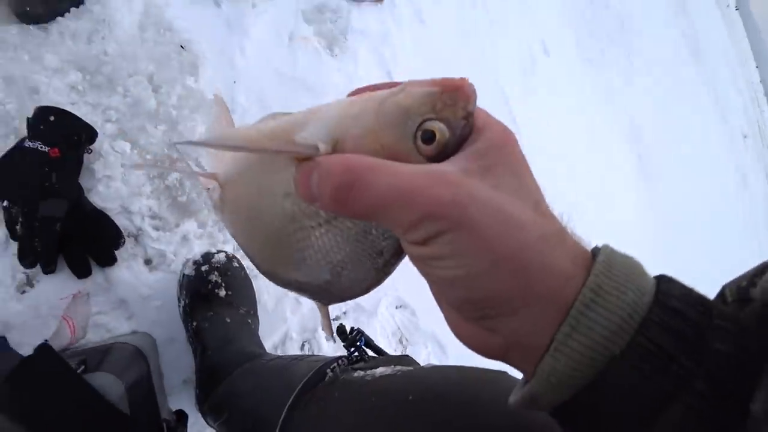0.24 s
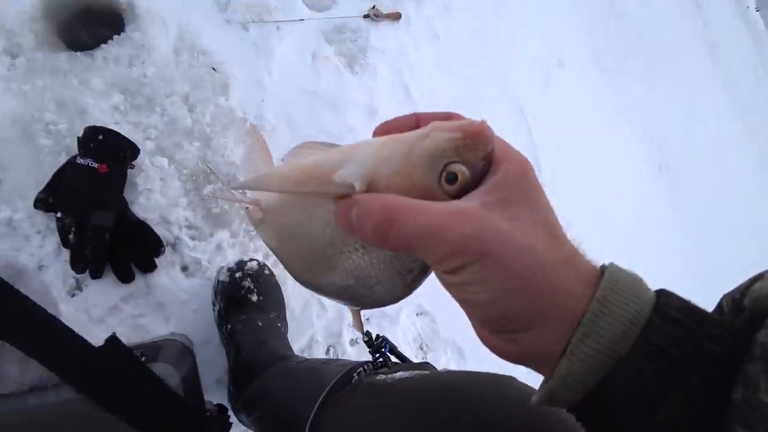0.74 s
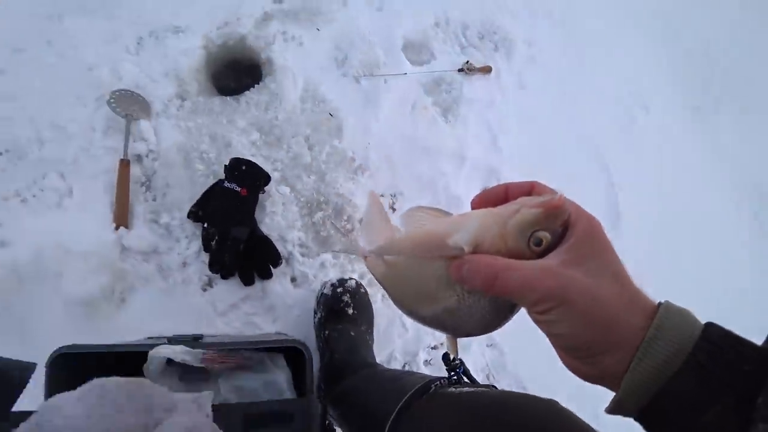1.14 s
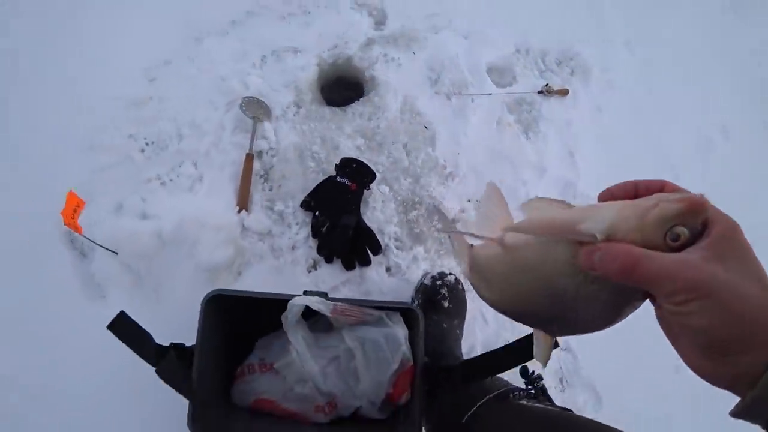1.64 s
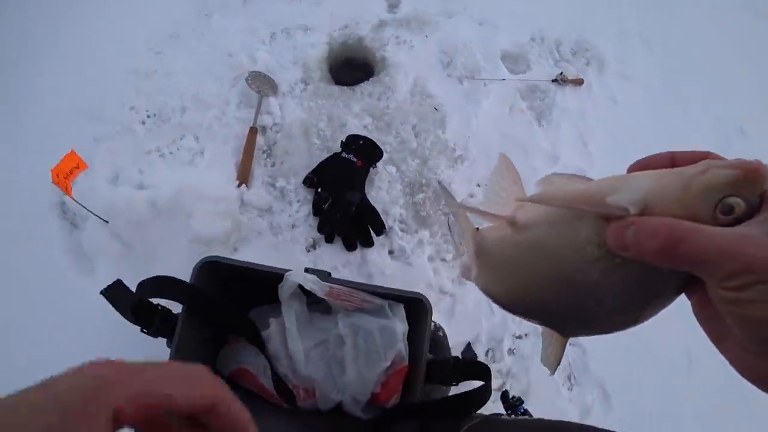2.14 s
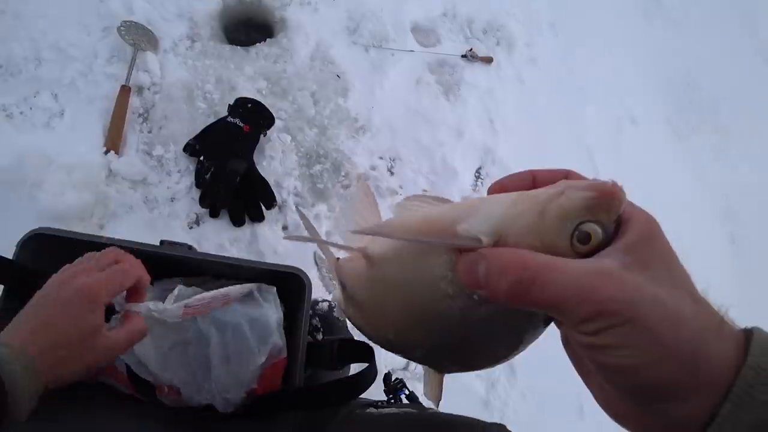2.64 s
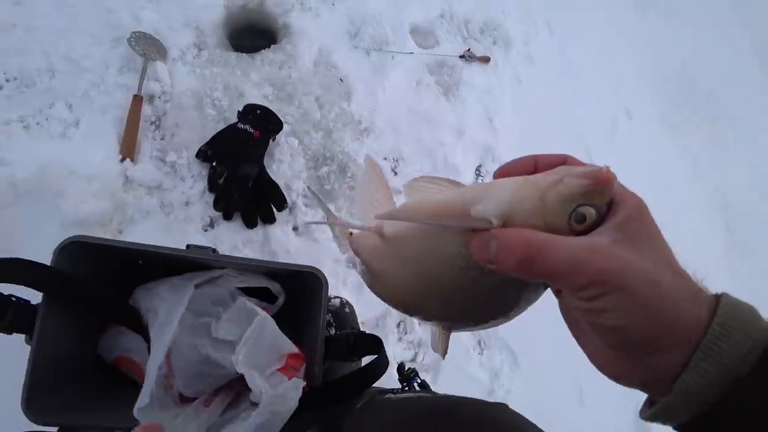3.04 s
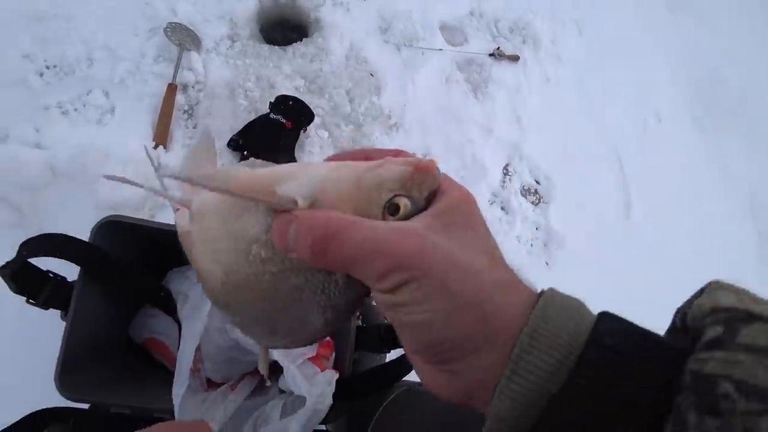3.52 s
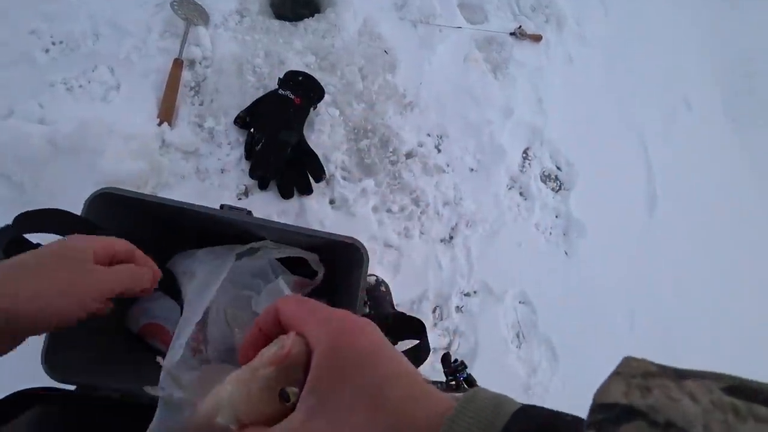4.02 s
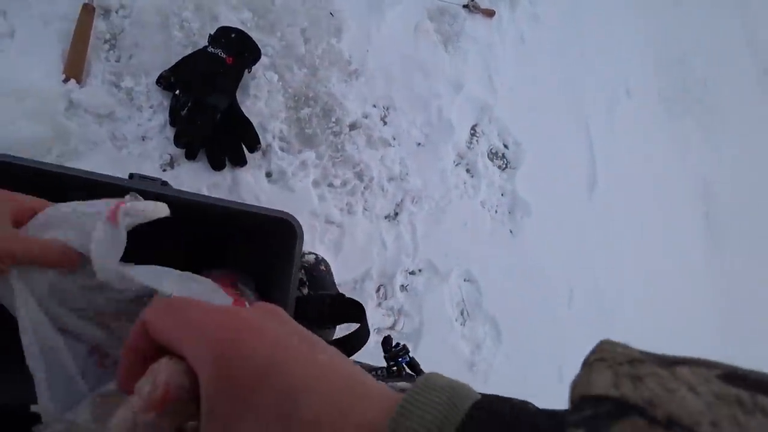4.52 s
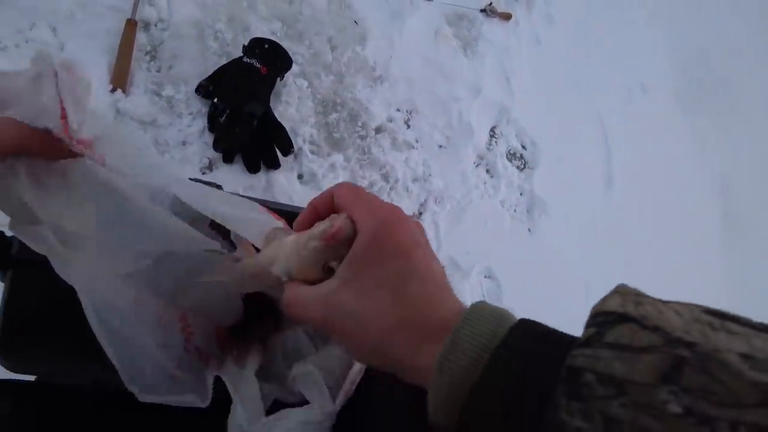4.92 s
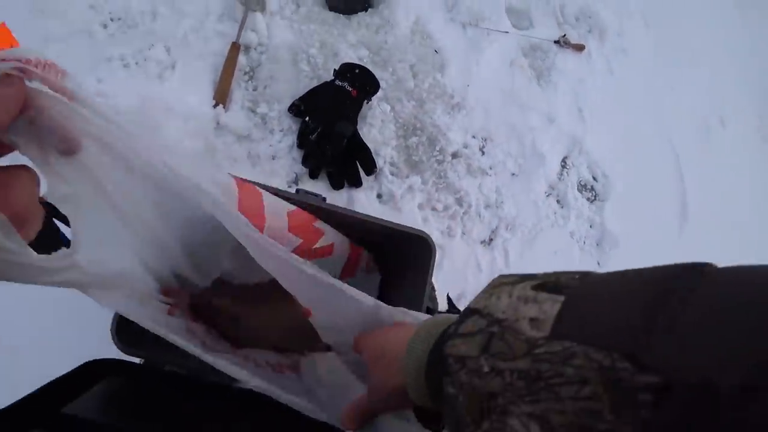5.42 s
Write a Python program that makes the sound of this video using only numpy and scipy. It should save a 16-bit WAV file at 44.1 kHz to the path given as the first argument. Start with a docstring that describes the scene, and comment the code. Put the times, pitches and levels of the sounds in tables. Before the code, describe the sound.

Close body-worn stereo microphone outdoors on a frozen lake. Low wind rumble and a dull double bump, then a hard flurry of hollow plastic box clatter with a small metallic clink, followed by loud bag crackling that thins into softer, crisp rustling as a fish goes in.

```python
"""A thin sheet rustles and snaps as an angler on a frozen lake drags a sack, then pulls open a plastic
bag in a tackle box and pushes a fish in: clumps of random creases over a sliding hiss, plus single cracks.
The plastic box clatters with its lid and buckle: decaying modes in thud, clack and tick layers.
Padded bumps and scrapes are modes and coloured grains; wind on two body-worn ports is coloured noise."""
import sys
import numpy as np
from scipy import signal
from scipy.fft import rfft, irfft
from scipy.io import wavfile

SR = 44100
rng = np.random.default_rng(int(sys.argv[2]) if len(sys.argv) > 2 else 0)


def dump(signal):
    """Clip the signal to [-1, 1] and save it as 16-bit WAV at the path in sys.argv[1]."""
    limited = np.clip(np.atleast_2d(signal).T, -1, 1)
    pcm = np.round(limited * 32767).astype(np.int16)
    wavfile.write(sys.argv[1], SR, pcm)


N = 249991

# moves of a hand that crumple sack or bag: start_s, length_s, hiss level_db, crispness_db
CRUMPLE_MOVES = [(0.073, .11, -52.5, -12.5), (0.313, 0.032, -45, -8), (0.56, .31, -50.5, -5.5),
                 (0.865, 0.15, -44.5, -1.5), (1.048, 0.16, -42, -5), (1.147, 0.1, -33.5, -1.5),
                 (1.244, 0.07, -28, -2), (1.339, 0.11, -33.5, -2), (1.466, 0.37, -39, -4.5),
                 (1.775, 0.13, -32, -4), (1.947, 0.03, -22, 1.5), (2.114, 0.061, -31, 0.5),
                 (2.212, 0.22, -34.5, -0.5), (2.405, 0.17, -22.5, 1), (2.616, 0.19, -25.5, -2),
                 (2.702, .22, -18, 3), (2.995, 0.032, -23.5, 3.5), (3.117, 0.12, -30.5, 4),
                 (3.299, 0.13, -33.5, 3), (3.467, 0.082, -38, 3), (3.56, 0.05, -34, 3.5),
                 (3.697, .18, -36, 2.5), (4.08, 0.16, -45.5, -0.5), (4.28, 0.16, -34.5, 0.5),
                 (4.448, 0.094, -34, 0.5), (4.526, .32, -29, 2.5), (4.877, 0.32, -31.5, 5),
                 (5.151, 0.33, -27.5, 5.5), (5.519, 0.17, -31, 6)]
# spectrum of the rustling film: frequency_hz, relative density_db
BAG_COLOUR = [(150, -0.5), (300, -4.5), (600, -6), (1000, -4), (1450, -2), (2200, -3.5), (4300, -1.5),
              (7600, -2.5), (8800, -4.5), (10200, -0.5), (11200, -5), (13000, -3)]
# single stiff creases that snap: start_s, relative level_db
CREASE_SNAPS = [(0.391, -25.5), (1.4604, -11.5), (1.9599, -2.5), (2.076, -14), (2.2573, -19),
                (2.308, -13.5), (2.4335, -3), (2.5426, -18), (2.76, -5), (2.844, -13), (2.984, -17),
                (3.013, -5), (3.233, -8.5), (3.342, -11), (4.103, -23)]
# knocks on the box: start_s, thud pitch_hz, then relative thud_db, clack_db, tick_db
BOX_KNOCKS = [(0.5, 232, -26.5, -34, -38), (0.535, 234, -26.5, -41.5, -53), (.994, 445, -19.5, -18, -22.5),
              (1.127, 400, -43, -18.5, -19.5), (1.145, 403, -31, -17.5, -19), (1.198, 460, -22.5, -24, -34),
              (1.267, 398, -6, -5.5, 4), (1.311, 389, -6.5, -4.5, -19), (1.3641, 442, -6.5, -1.5, -16),
              (1.385, 442, -7.5, -16, -9.5), (1.404, 433, -16, -18, -20), (1.419, 410, -26, -9.5, -7.5),
              (1.432, 557, -12.5, -12.5, -35), (1.469, 417, -8.5, -20, -34), (1.495, 392, -25, -19, -8),
              (1.506, 312, -12, -14.5, -28), (1.519, 323, -21, -21, -24), (1.533, 616, -30, -21, -24),
              (1.571, 380, -21.5, -13.5, -29), (1.593, 280, -20, -17.5, -24), (1.627, 400, -18, -25, -24),
              (1.664, 562, -5, 4.5, -6.5), (1.692, 574, -7.5, -6, -11), (1.788, 314, -17, -15.5, -12),
              (1.836, 386, -15, -20, -12), (1.852, 390, -16, -34, -28), (1.931, 237, -17, -17, -26),
              (1.992, 290, -16, -24, -21), (2.027, 722, -11.5, -19, -15), (2.14, 286, -18.5, -23.5, -25)]
# struck panel, pitched by the spot: multiple of thud pitch (ratio), t60_s, relative level_db
THUD_MODES = [(.72, 0.074, -4.5), (1, 0.059, 0.5), (1.1, 0.027, -1), (1.42, 0.038, -6.5)]
# stiffer box walls and rim: frequency_hz, t60_s, relative level_db
CLACK_MODES = [(818, 0.058, -8.5), (958, 0.028, -6.5), (1128, 0.043, 0), (1295, 0.042, -2.5),
               (1606, 0.042, -2.5), (1885, 0.018, -1)]
# stiffest, brightest modes of the box: frequency_hz, t60_s, relative level_db
TICK_MODES = [(2780, 0.018, -1.5), (2910, 0.011, 4.5), (3210, 0.024, -1), (3760, 0.01, 2.5),
              (5200, 0.024, -9)]
# rings of the strap buckle: start_s, level_db
BUCKLE_CLINKS = [(1.668, -13), (1.692, -24)]
# metal buckle: frequency_hz, t60_s, relative level_db
BUCKLE_MODES = [(2250, 0.28, -7.5), (4413, 0.28, -8.5), (4540, 0.12, -4.5), (6860, 0.04, -7),
                (9900, 0.026, -2)]
# dull bumps of hands and gear: start_s, pitch_hz, level_db, scuff against body_db
HAND_BUMPS = [(.332, 162.5, -8, -4), (0.3393, 296, -7, -6), (2.405, 213, -21, -14), (4.238, 258, -24, -16),
              (5.432, 133, -17.5, -17)]
# padded body of a bump: multiple of bump pitch (ratio), t60_s, relative level_db
BUMP_MODES = [(.74, 0.06, -3.5), (1, 0.072, -0.5), (1.35, 0.045, -4), (1.95, 0.066, -10.5), (3.4, 0.012, 5)]
# gear and sleeves scraping over the box: start_s, length_s, level_db
SCRAPE_MOVES = [(0.783, 0.34, -42), (1.112, 0.17, -34), (1.33, 0.2, -28.5), (1.592, 0.12, -30.5),
                (1.784, 0.21, -29), (2.129, 0.033, -32.5), (2.353, 0.21, -35), (4.274, 0.24, -50),
                (5.36, 0.25, -45.5)]
# spectrum of scraping: frequency_hz, relative density_db
SCRAPE_COLOUR = [(110, -26), (190, 2), (380, -6), (520, -8), (750, -7), (1000, -17.5), (2400, -17.5),
                 (3500, -47)]
# wind strength: time_s, relative level_db, straight lines in between
WIND_STRENGTH = [(0.0, -24), (0.08, -20.5), (0.4, -25), (0.68, -29), (0.95, -22), (1.1, -38.5),
                 (1.35, -23.5), (1.8, -24), (2.02, -30.5), (2.5, -25), (2.9, -24.5), (3.58, -30),
                 (3.75, -38), (4.05, -41), (4.6, -42.5), (5.15, -35), (5.67, -40.5)]
# spectrum of the big eddies: frequency_hz, relative density_db
RUMBLE_COLOUR = [(10, -10), (22, 2.5), (40, -1.5), (65, -7.5), (100, -18.5), (200, -63.5)]
# spectrum of the small eddies: frequency_hz, relative density_db
FLUTTER_COLOUR = [(40, -8.5), (75, 1), (115, 3), (160, -4.5), (230, -12.5), (400, -21.5), (1000, -41)]
# stereo image of the near sounds: frequency_hz, left phase lead_rad, left minus right level_db
PORT_BALANCE = [(150, 0.019, -1), (500, -0.47, 3.5), (1100, -0.8, 4.5), (2200, -0.66, 4.5),
                (4500, -0.22, 2.5), (7800, 0.67, 5), (10500, 0.61, 4)]

TIME = np.arange(N) / SR
FREQS = np.maximum(np.arange(N // 2 + 1) * SR / N, 1)
HIT_TIME = np.arange(SR // 3) / SR
TOP_HZ = 11100  # upper limit of the whole sound
SPEED_UP_SHARE = 0.3  # a hand gathers speed over this share of its move
CRUMPLE_SETTLE_S, CRUMPLE_REST_DB = 0.072, -54  # film relaxes (time constant); faint stirring in between
CREASE_DB_PER_DB = 0.81  # dB gained in tight creases for each dB lost in broad folds
SCRAPE_SETTLE_S, SCRAPE_REST_DB = 0.054, -54  # scrape dies away (time constant); faint rub in between
FLUTTER_DB_PER_DB, WIND_USUAL_DB = 0.97, -28  # small eddies grow with wind, counted from its usual level


def crumpling():
    """Gain and crispness (dB) of the sheet; overlapping moves add in power."""
    power, crisp_sum = undb(CRUMPLE_REST_DB) ** 2, 0
    for s, length, db, crisp_db in CRUMPLE_MOVES:
        share = (undb(db) * move(s, length, CRUMPLE_SETTLE_S)) ** 2
        power = power + share
        crisp_sum = crisp_sum + crisp_db * share
    return np.sqrt(power), crisp_sum / power


def bag(rate=7000, spread_db=4.0, crack_rate=110, crack_db=-11, clump_db=1.28, patchy_db=1.5,
        slide_db=-1, width=0.34, body_db=-4.5, fine_db=-6.0, hiss_db=-1):
    """Creases buckle in clumps, each with its own colour, over the hiss of film sliding on film."""
    effort, crisp = crumpling()
    # a haze of tiny creases, and a few stiff ones that tick on their own
    haze = unit(buckles(rate, spread_db))
    ticks = unit(buckles(crack_rate, spread_db=2.0))
    clicks = haze + undb(crack_db) * ticks
    edges = np.geomspace(180, 13000, num=13)
    film = 0
    for lo, hi in zip(edges, edges[1:]):
        # every crease lies elsewhere on the sheet: its own mid and side weight
        creases = clicks * rng.standard_normal((2, N))
        slide = undb(slide_db) * rng.standard_normal((2, N))
        film = film + band(creases + slide, lo, hi) * undb(patchy_db * walk(35))
    film = colour(film, BAG_COLOUR) * undb(clump_db * walk(110))
    # broad folds sound low, tight creases high
    spectrum = rfft(film)
    low = irfft(spectrum / (1 + (FREQS / 2500) ** 4), N)
    high = irfft(spectrum / (1 + (7600 / FREQS) ** 8), N)
    hiss = undb(hiss_db) * unit(film - low - high)
    folds = undb(body_db - crisp) * unit(low)
    tight = undb(fine_db + CREASE_DB_PER_DB * crisp) * unit(high)
    mid, side = effort * (hiss + folds + tight)
    return mid + width * np.array([side, -side])


def snaps(gain_db=-3):
    """Single stiff creases flip over, each a short bright noise crack."""
    out = np.zeros(N)
    for s, db in CREASE_SNAPS:
        add(out, s, undb(db + gain_db) * burst(2260, 10700, t60=0.023))
    return out


def box(contact_s=0.00026, chatter_s=0.00299, chatter_db=-5, crack_db=-9,
        thud_gain_db=0, clack_gain_db=-1.0, tick_gain_db=-1):
    """Lid and fittings strike the hollow plastic box; each knock has its own levels of thud, clack and tick."""
    out = np.zeros(N)
    for s, thud_hz, thud_db, clack_db, tick_db in BOX_KNOCKS:
        panel = [(thud_hz * ratio, t60, db) for ratio, t60, db in THUD_MODES]
        thud = ring(panel, detune=0.025, scatter_db=4.5)
        clack = ring(CLACK_MODES, detune=0.029, scatter_db=2.5)
        # the loose part chatters against the wall just after the blow
        add(clack, chatter_s, undb(chatter_db) * burst(420, 1420, t60=0.035))
        tick = ring(TICK_MODES, detune=0.054, scatter_db=1.0)
        tick = tick + undb(crack_db) * burst(3800, 9400, t60=0.016)
        blow = undb(thud_db + thud_gain_db) * thud
        blow = blow + undb(clack_db + clack_gain_db) * clack
        blow = blow + undb(tick_db + tick_gain_db) * tick
        add(out, s, blow * (1 - np.exp(-HIT_TIME / contact_s)))
    for s, db in BUCKLE_CLINKS:
        add(out, s, undb(db) * ring(BUCKLE_MODES, detune=0, scatter_db=2.5))
    return out


def handling(scrape_db=0, press_s=0.00036):
    """Padded bumps with a scuff of cloth, and gear that sticks and slips over the box."""
    rub = undb(SCRAPE_REST_DB)
    for s, length, db in SCRAPE_MOVES:
        rub = rub + undb(db + scrape_db) * move(s, length, SCRAPE_SETTLE_S)
    grains = buckles(1500, spread_db=4.5) * rng.standard_normal(N)
    out = rub * colour(grains, SCRAPE_COLOUR)
    for s, hz, db, scuff_db in HAND_BUMPS:
        padded = [(hz * ratio, t60, mode_db) for ratio, t60, mode_db in BUMP_MODES]
        body = ring(padded, detune=0.047, scatter_db=1.5) * (1 - np.exp(-HIT_TIME / press_s))
        scuff = burst(440, 1620, t60=0.042) + undb(-6.0) * burst(1400, 5300, t60=0.013)
        add(out, s, undb(db) * (body + undb(scuff_db) * scuff))
    return out


def wind(rumble_width=0.21, flutter_width=1.38, gust_db=2, eddy_db=5.5, rumble_db=1.0, flutter_db=-38):
    """Big eddies press on both ports nearly alike; small ones come in lumps that differ between ports."""
    strength = np.interp(TIME, *np.transpose(WIND_STRENGTH))
    rumble = colour(rng.standard_normal((2, N)), RUMBLE_COLOUR)
    big = unit(rumble * undb(gust_db * walk(14))) * undb(strength + rumble_db)
    lumps = rng.standard_normal((2, N)) * undb(eddy_db * walk(40))
    small_db = flutter_db + FLUTTER_DB_PER_DB * (strength - WIND_USUAL_DB)
    small = colour(lumps, FLUTTER_COLOUR) * undb(small_db)
    side = rumble_width * big[1] + flutter_width * small[1]
    return big[0] + small[0] + np.array([side, -side])


def move(s, length, settle_s):
    """One move of a hand: it gathers speed, keeps on, stops and the material settles."""
    speed_up = np.clip((TIME - s) / (SPEED_UP_SHARE * length), 0, 1)
    return speed_up * np.exp(-np.maximum(TIME - s - length, 0) / settle_s)


def buckles(rate, spread_db):
    """Random tiny impacts, rate a second, a few much bigger than the rest."""
    happens = rng.random(N) < rate / SR
    return happens * undb(spread_db * np.minimum(rng.standard_normal(N), 2.6))


def ring(modes, detune, scatter_db):
    """Modes after one blow, peak 1; each spot of contact weights them anew."""
    y = np.zeros(len(HIT_TIME))
    for hz, t60, db in modes:
        gain = undb(db + scatter_db * rng.standard_normal()) * rng.choice([-1, 1])
        mode_hz = hz * (1 + detune * rng.standard_normal())
        y += gain * fade(t60) * np.sin(2 * np.pi * mode_hz * HIT_TIME)
    return y / np.abs(y).max()


def burst(lo_hz, hi_hz, t60):
    """A short crack of band-passed noise, peak 1."""
    y = band(rng.standard_normal(len(HIT_TIME)) * fade(t60), lo_hz, hi_hz)
    return y / np.abs(y).max()


def fade(t60):
    """Free decay after a blow, down 60 dB at t60 seconds."""
    return np.exp(-np.log(1000) * HIT_TIME / t60)


def walk(rate):
    """Random drift: straight lines between normal draws, rate a second."""
    return np.interp(TIME * rate, np.arange(N), rng.standard_normal(N))


def band(x, lo_hz, hi_hz):
    """Causal band-pass."""
    edges = [lo_hz, min(hi_hz, SR / 2 - 1)]
    return signal.sosfilt(signal.butter(2, edges, "band", fs=SR, output="sos"), x)


def colour(x, spectrum):
    """Filter x by a spectrum table, at rms 1."""
    return unit(irfft(rfft(x) * undb(over_hz(spectrum)[0]), N))


def over_hz(table):
    """The columns of a frequency table, one value a bin."""
    hz, *columns = np.transpose(table)
    return [np.interp(np.log(FREQS), np.log(hz), c) for c in columns]


def unit(x):
    """Scale to rms 1."""
    return x / np.sqrt(np.mean(x ** 2))


def undb(db):
    """Decibels to gain."""
    return 10 ** (np.asarray(db) / 20)


def add(out, s, sound):
    """Mix a sound in at time s (seconds)."""
    part = out[max(int(s * SR), 0):][:len(sound)]
    part += sound[:len(part)]


def scene():
    """Near sounds reach the two ports with differing phase and level; the wind acts on the ports directly."""
    near = rfft(bag() + snaps() + box() + handling())
    lead, tilt_db = over_hz(PORT_BALANCE)
    left = undb(tilt_db / 2) * np.exp(1j * lead / 2)
    return irfft(near * np.array([left, 1 / left]), N) + wind()


def record(dry):
    """Peaks beyond full scale overload the input and clip; the top is cut steeply."""
    clipped = np.clip(dry, -1, 1)
    return signal.sosfilt(signal.ellip(12, 0.2, 70, TOP_HZ, fs=SR, output="sos"), clipped)


dry = scene()
out = record(dry)
dump(out)
```